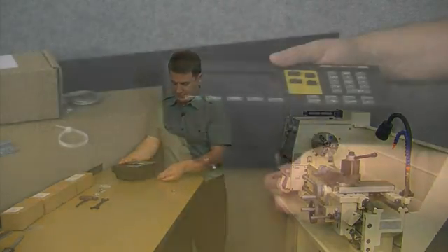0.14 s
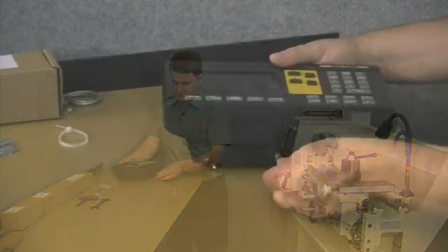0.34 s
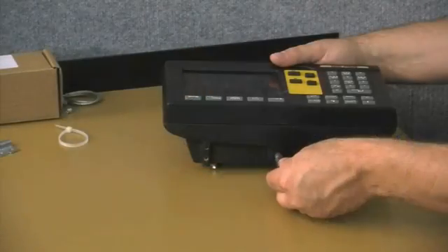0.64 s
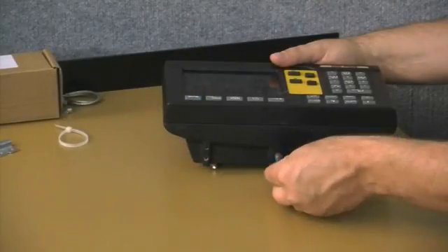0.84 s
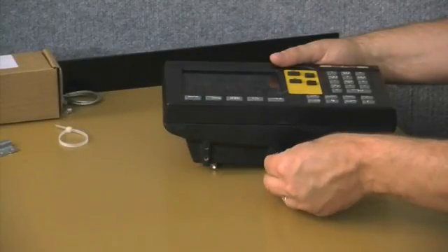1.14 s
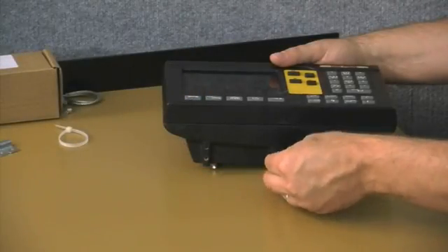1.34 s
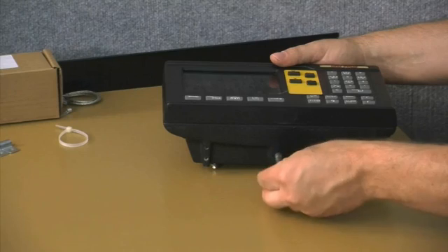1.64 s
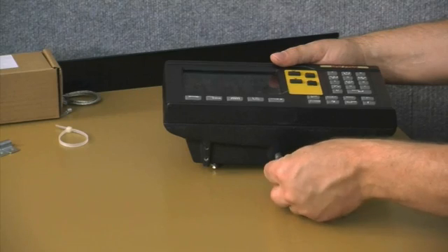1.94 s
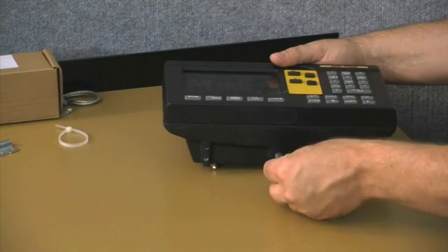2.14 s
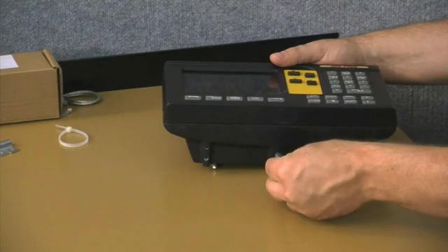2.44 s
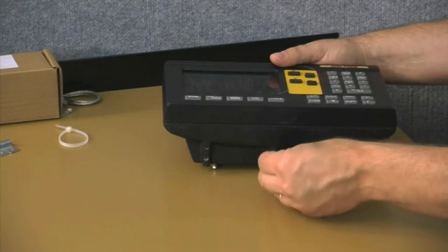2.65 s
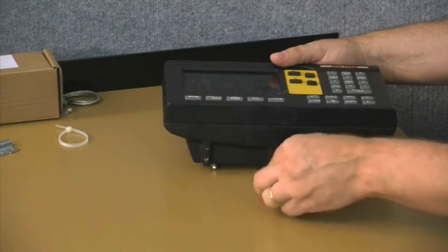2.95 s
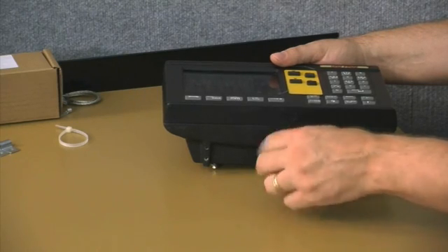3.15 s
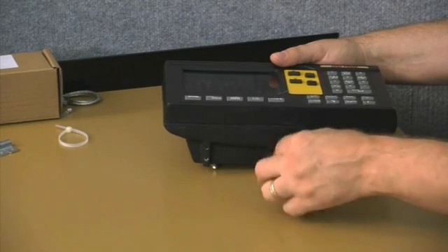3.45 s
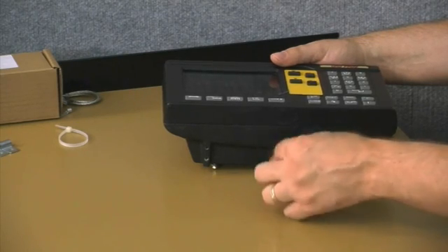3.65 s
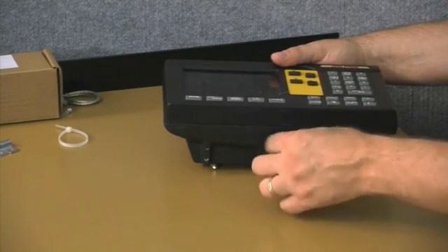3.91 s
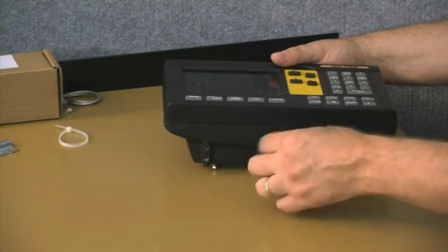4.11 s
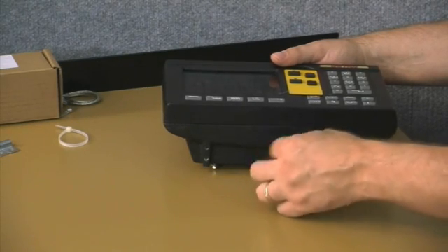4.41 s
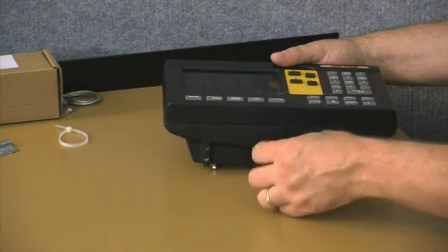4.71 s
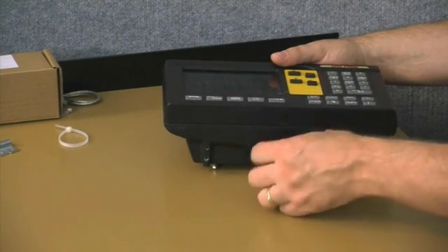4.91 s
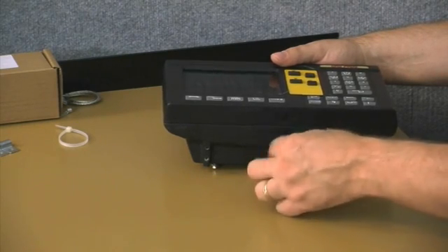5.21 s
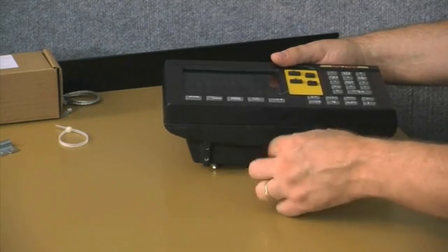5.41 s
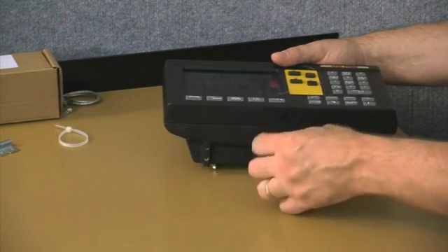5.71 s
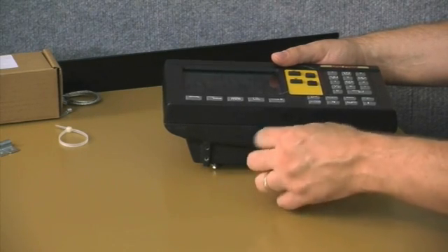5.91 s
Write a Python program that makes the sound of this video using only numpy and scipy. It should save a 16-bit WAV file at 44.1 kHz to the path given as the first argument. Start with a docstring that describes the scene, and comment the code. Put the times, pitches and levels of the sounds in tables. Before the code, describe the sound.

A quiet workshop with low steady ventilation rumble and faint hiss; everything else is close, with a brief diffuse echo. At about 0.2 s there is a faint nudge, then crisp metallic clicks with small case jolts at 0.44 and 0.6 s and a gritty thread scrape. From 1.1 to 1.3 s come dull boxy taps, at 1.5 s another clear click, then sparse faint nudges and rubs until 2.7 s. Around 3 s a first weak flick makes a light rattle with a click at 3.14 s; stronger scraping and chatter follow at 3.3 s, a bright burst at 3.56 s, and a weaker one near 3.7 s. From 4.1 s rolls arrive roughly every 0.2 s, each a finger bump then a bright, dense rattle under a tenth of a second long with hollow plastic drumming. They are loudest from 5.1 to 5.7 s; a softer one comes at 5.9 s.

```python
"""A steel nut on a threaded stud chatters as about five finger flicks a second spin it along a plastic-cased instrument.
First it only clicks and scrapes as the thread catches; then each flick bumps the case and rattles the loose nut.
Dense random impacts make the roll, and short noise bursts the single contacts; both excite modes of steel and case.
Patchy stick and slip makes the scrape; a diffuse workshop echo and filtered-noise ventilation surround it all."""
import sys
import numpy as np
from scipy import signal
from scipy.fft import rfft, irfft
from scipy.io import wavfile
from scipy.ndimage import uniform_filter1d

SR = 44100
rng = np.random.default_rng(int(sys.argv[2]) if len(sys.argv) > 2 else 0)


def waveform_to_disk(signal):
    """Save audio, clipped to [-1, 1], as 16-bit WAV at the path in sys.argv[1]."""
    frames = np.transpose(np.atleast_2d(signal))
    scaled = np.clip(frames, -1, 1) * 32767
    samples = np.round(scaled).astype(np.int16)
    wavfile.write(sys.argv[1], SR, samples)


N = 267539
TIME = np.arange(N) / SR
SIZE = 8192  # samples in an impulse response or a single contact
TOP_HZ = 15700  # upper limit of the sound
ROLL_HARD_DB = -29  # level of a middling roll, the reference for hardness
CASE_SHARE = 0.62  # dB that the case gains per dB of steel
HARDENING = 0.73  # dB of top treble gained per dB of level
ROLL_EDGE_DB = 12.5  # fall of a roll over its swell or dying time
ROLL_REACH = 0.92  # beyond this relative distance from its top a roll falls away steeply
TICK_GAP_S = 0.016  # the wobbling nut strikes the thread about once a turn
TICK_JITTER_S, TICK_SCATTER_DB = 0.002, 2  # unevenness of those ticks in time and level


def undb(db):
    """Decibel definition: amplitude gain is ten to the power of dB over 20."""
    return 10 ** (np.asarray(db) / 20)


def unit(x):
    """Normalisation: scale to rms 1."""
    return x / np.sqrt(np.mean(x ** 2))


def add(track, s, sound):
    """Superposition: mix a sound in at time s."""
    i = max(int(s * SR), 0)
    track[i:i + len(sound)] += sound[:max(N - i, 0)]


def colour(points, size):
    """Spectral shaping: gain at each FFT bin, interpolated on log frequency from (frequency [Hz], level [dB])."""
    hz, db = np.transpose(points)
    bins = np.arange(size // 2 + 1) * SR / size
    return undb(np.interp(np.log(bins + 1), np.log(hz), db))


def ring(force, response):
    """Linear response: convolve a force with an impulse response."""
    return signal.fftconvolve(force, response)[:len(force)]


def treble(x, db, corner_hz=7500):
    """Contact time sets bandwidth: a harder, shorter contact lifts the top; a softer one lowers it."""
    lowpass = signal.butter(2, min(corner_hz, SR / 3), fs=SR, output="sos")
    low = signal.sosfiltfilt(lowpass, x)
    return low + undb(db) * (x - low)


def hardness(db):
    """Nonlinear contact: the top treble in dB grows with the level, within limits."""
    return np.clip(HARDENING * (db - ROLL_HARD_DB), -9, 4)


def through_case(steel_db):
    """Contact shortening: a harder contact is shorter, so the case gains less level than the steel."""
    return ROLL_HARD_DB + CASE_SHARE * (steel_db - ROLL_HARD_DB)


def grains(rate, spread_db):
    """Poisson-like impacts: tiny strikes at random times, of random sign and unequal size."""
    struck = rng.random(N) < rate / SR
    sign = rng.choice([-1, 1], N)
    return struck * sign * undb(spread_db * np.clip(rng.standard_normal(N), -2, 2))


def uneven(rate, depth_db):
    """Random modulation: a gain that glides between random levels, some rate of them a second."""
    steps = np.clip(rng.standard_normal(N), -2, 2)
    return undb(depth_db * np.interp(TIME * rate, np.arange(N), steps))


# ventilation and hiss: (frequency [Hz], relative spectral density [dB per Hz])
AIR_SPECTRUM = [(20, -13), (55, 1), (80, -4), (130, 4.5), (180, -6), (250, -2), (480, -3), (620, -7.5),
                (800, -14), (1300, -14), (2000, -20), (5000, -21), (15500, -23)]


def air(level_db=-63):
    """Broadband flow noise: steady ventilation rumble under a faint hiss."""
    noise = irfft(rfft(rng.standard_normal(N)) * colour(AIR_SPECTRUM, N), N)
    return undb(level_db) * unit(noise)


# workshop echo by band: (centre [Hz], level [dB], 60 dB decay time [s])
ROOM_BANDS = [(125, -4.5, 0.94), (270, -0.5, 1), (516, 0, 0.76), (880, -7.5, 0.35), (1940, -7.5, 0.5),
              (4200, -8.5, 0.43), (7700, -14, 0.32), (16000, -19, 0.41)]


def workshop(dry, build_s=0.0036, wall_s=0.0367, wall_width_s=0.0031, wall_gain=1.0):
    """Diffuse reverberation: a tail builds up and decays by band, with a cluster of echoes from the nearest walls."""
    t, out = TIME[:SR], 0
    spectrum = rfft(rng.standard_normal(SR))
    log_hz = np.log(np.arange(len(spectrum)) + 1)
    centres = np.log([row[0] for row in ROOM_BANDS])
    walls = 1 + wall_gain * np.exp(-((t - wall_s) / wall_width_s) ** 2)
    for share, (_, db, t60) in zip(np.eye(len(ROOM_BANDS)), ROOM_BANDS):
        fade = np.exp(-np.log(1000) * t / t60) * (1 - np.exp(-t / build_s)) * walls
        band = irfft(spectrum * np.interp(log_hz, centres, share), SR)
        out = out + undb(db) * fade / np.linalg.norm(fade) * band
    return ring(dry, out)


def body(modes, crack):
    """Minimum-phase modal response: resonances on a dry crack, folded in the cepstrum, energy 1."""
    bins = np.arange(SIZE // 2 + 1) * SR / SIZE
    power = colour(crack, SIZE) ** 2
    for hz, width, db in modes:
        power = power + undb(2 * db) / (1 + ((bins - hz) / width) ** 2 * 2) ** 2
    # doubling the early half of the cepstrum and clearing the late half makes the response causal
    cepstrum = irfft(np.log(power) / 2)
    cepstrum[1:SIZE // 2] *= 2
    cepstrum[SIZE // 2 + 1:] = 0
    response = irfft(np.exp(rfft(cepstrum)))
    return response / np.linalg.norm(response)


def seatings(modes, crack, spread, count):
    """Boundary conditions shift modes: the nut seats differently at each touch, so the ring moves a little."""
    responses = []
    for _ in range(count):
        shifted = [(hz * (1 + spread * rng.standard_normal()), width, db) for hz, width, db in modes]
        responses.append(body(shifted, crack))
    return responses


def knock(response, rise_s, length_s, window_s):
    """Impact excitation: a few milliseconds of micro-bounces ring an object; its loudest moment has rms 1."""
    t = TIME[:SIZE]
    force = rng.standard_normal(SIZE) * (1 - np.exp(-(t / rise_s) ** 2)) * np.exp(-(t / length_s) ** 4)
    sound = ring(force, response)
    loudest = uniform_filter1d(sound ** 2, max(int(window_s * SR), 2)).max()
    return sound / np.sqrt(loudest)


def bump(panel, thud_db, drum_db, thud_hz=40, thud_s=0.006):
    """Quasi-static push and panel vibration: a soft damped thud, and the case panels drum."""
    t = TIME[:SIZE]
    push = np.sin(2 * np.pi * thud_hz * t) * np.exp(-t / thud_s)
    drum = knock(panel, rise_s=0.0014, length_s=0.0099, window_s=0.0066)
    return undb(thud_db) * push / push.max() + undb(drum_db) * drum


def skin_hiss(size):
    """Friction noise of skin sliding over steel: a narrow high hiss of rms 1."""
    shape = colour([(2000, -22), (6000, -6), (8200, -6), (9300, 3), (10800, -24), (13000, -26)], size)
    return unit(irfft(rfft(rng.standard_normal(size)) * shape, size))


# the nut is turned slowly and the threads rub, levels before the body trims:
# (start [s], length [s], level at the start [dB], level at the end [dB], skin hiss level [dB])
THREAD_RUBS = [(0.176, 0.07, -66, -73, -90), (0.571, 0.041, -52.5, -46.5, -61),
               (1.112, 0.038, -67, -58, -83), (1.297, 0.025, -53, -51, -76),
               (1.598, 0.039, -64, -62.5, -78), (2.037, 0.06, -62, -62, -82), (2.485, 0.14, -65, -62, -74),
               (2.69, 0.025, -61, -64, -81), (3.01, 0.09, -57, -55.5, -74), (3.3, 0.068, -49, -44.5, -55),
               (3.385, 0.12, -46, -47.5, -67), (3.743, 0.3, -49.5, -54.5, -78),
               (4.061, 0.035, -53, -51, -59), (5.061, 0.016, -36, -34, -48), (5.471, 0.022, -47, -41, -59)]


def rubbing(steel, case, panel, case_db=2.0, steel_db=-10, panel_db=-9, top_db=-4):
    """Stick-slip friction: thread slides patchily on thread, heard mostly through the case, with finger hiss."""
    pressure, skin = np.zeros(N), np.zeros(N)
    for s, length, start_db, end_db, skin_db in THREAD_RUBS:
        size = int(length * SR)
        add(pressure, s, undb(np.linspace(start_db, end_db, size)))
        add(skin, s, np.full(size, undb(skin_db)))
    slips = unit(grains(rate=980, spread_db=3) * uneven(rate=120, depth_db=4.5)) * pressure
    bodies = undb(case_db) * case + undb(steel_db) * steel + undb(panel_db) * panel
    scrape = ring(treble(slips, top_db), bodies)
    return scrape + skin * skin_hiss(N)


# the nut is pressed onto the stud, clicks and jolts the case, click levels before trim:
# (time [s], steel level [dB], case level [dB], top treble [dB], thud level [dB])
NUT_PRESSES = [(0.4396, -32.5, -42.5, -1, -47), (0.5961, -32, -38, 8, -45.5),
               (1.5168, -34.5, -36, 1.5, -46), (3.1357, -29.5, -48, 4, -47)]


def fingers(panel, press_drum_db=-9, thud_db=-14, drum_db=0.0, skin_db=-17, skin_delay_s=0.034, skin_s=0.0091):
    """Momentum transfer and friction: each touch bumps the case; in a flick the skin then hisses across the nut."""
    out = np.zeros(N)
    for s, *_, push_db in NUT_PRESSES:
        add(out, s, bump(panel, push_db, push_db + press_drum_db))
    stroke = np.exp(-((TIME[:SIZE] - skin_delay_s) / skin_s) ** 2)
    for s, touch_db, bump_db, *_ in FINGER_FLICKS:
        add(out, s, bump(panel, through_case(touch_db) + thud_db, bump_db + drum_db))
        add(out, s, undb(touch_db + skin_db) * skin_hiss(SIZE) * stroke)
    return out


def roll(s, fastest, swell, dying):
    """Envelope of spin-up and decay: 0 at full speed, about 1 at either end, then steeply more."""
    away = np.maximum((fastest - s) / swell, (s - fastest) / dying)
    return away * np.clip(away / ROLL_REACH, 1, 10) ** 2


def wobble(tick_db=-5.5, edge_db=4.5, top_db=2.0, top_scatter_db=3, case_db=-7, count=5):
    """Quasi-periodic impacts around each roll's top: (time [s], steel [dB], case [dB], top treble [dB])."""
    ticks = []
    for *_, fastest, swell, dying, roll_db, _ in FINGER_FLICKS:
        scatter = rng.standard_normal((count, 3))
        for turn, (late, louder, brighter) in enumerate(scatter, -(count // 2)):
            s = fastest + turn * TICK_GAP_S + late * TICK_JITTER_S
            db = roll_db + tick_db + TICK_SCATTER_DB * louder - edge_db * roll(s, fastest, swell, dying)
            ticks.append((s, db, through_case(db) + case_db, top_db + hardness(db) + top_scatter_db * brighter))
    return ticks


# the held nut nudges the stud, heard mostly through the case: (time [s], case level before trim [dB])
STUD_NUDGES = [(0.178, -50), (1.1414, -50.5), (1.253, -55.5), (1.29, -49), (1.3098, -44), (1.3207, -50),
               (1.483, -47), (1.728, -55.5), (1.7933, -50), (2.038, -53), (2.0948, -46.5), (2.508, -55),
               (2.697, -53.5)]
# hardest single strikes of the spinning nut: (time [s], steel level before trim [dB], top treble [dB])
NUT_STRIKES = [(3.074, -39.5, -12), (3.125, -39, 3), (3.1537, -33, -2), (3.3563, -37.5, 8.5),
               (3.555, -25, 8), (3.5641, -28.5, 11), (3.6004, -34.5, -5), (3.6242, -33.5, 8.5),
               (3.7093, -31, -3), (3.7284, -35.5, -6), (3.8604, -37, -11), (3.8706, -38, 11.5),
               (4.1077, -26, 6), (4.1514, -33.5, 3), (4.2807, -33, -3), (4.3208, -33, 6.5),
               (4.4653, -30, 3), (4.4748, -33, -1), (4.5292, -31, 0), (4.68, -25, 0), (4.6858, -21, -5),
               (4.7445, -30, -2), (4.8451, -27, 1), (4.8638, -28.5, 4), (4.941, -32, -10),
               (5.0678, -30, 13), (5.0862, -23, 10), (5.1072, -25, 11.5), (5.2886, -25, -5),
               (5.3315, -33, 4), (5.3468, -33, 4), (5.6728, -35, -8), (5.7047, -27.5, 11),
               (5.7341, -28, -3), (5.8851, -33, -2), (5.9193, -32.5, 5)]


def contacts(nudge_steel_db=-14, nudge_top_db=-12, touch_case_db=-3, touch_top_db=5.5, strike_case_db=-8):
    """Discrete impacts of nut and stud: (time [s], steel [dB], case [dB], top treble [dB])."""
    presses = [(s, steel, case, top_db) for s, steel, case, top_db, _ in NUT_PRESSES]
    nudges = [(s, db + nudge_steel_db, db, nudge_top_db) for s, db in STUD_NUDGES]
    touches = [(s, db, through_case(db) + touch_case_db, hardness(db) + touch_top_db)
               for s, db, *_ in FINGER_FLICKS]
    strikes = [(s, db, through_case(db) + strike_case_db, top_db) for s, db, top_db in NUT_STRIKES]
    return presses + nudges + touches + strikes + wobble()


def clicks(hits, steels, cases, steel_db=-0.37, case_db=-1.5):
    """Impact across a clearance: the nut tips across its play, strikes the thread and rings steel and case."""
    out = np.zeros(N)
    for s, steel_level, case_level, top_db in hits:
        seat = rng.integers(len(steels))
        tick = knock(steels[seat], rise_s=0.00033, length_s=0.0041, window_s=0.0017)
        thump = knock(cases[seat], rise_s=0.00049, length_s=0.0052, window_s=0.0016)
        add(out, s, undb(steel_level + steel_db) * treble(tick, top_db))
        add(out, s, undb(case_level + case_db) * thump)
    return out


# a finger lands, bumps the case and flicks the nut into a roll, levels before trim:
# (landing [s], touch level [dB], bump level [dB], fastest moment [s], swell [s], dying [s],
# roll level [dB], panel drumming level [dB])
FINGER_FLICKS = [(2.988, -55.5, -62, 3.15, 0.056, 0.061, -39.5, -51.5),
                 (3.286, -33, -41.5, 3.343, 0.037, 0.083, -40, -61),
                 (3.4857, -34.5, -41, 3.562, 0.053, 0.04, -28.5, -39),
                 (3.6705, -39, -43, 3.72, 0.018, 0.22, -39.5, -52.5),
                 (3.864, -45, -44, 3.915, 0.014, 0.021, -44.5, -54),
                 (4.0434, -38, -44.5, 4.122, 0.029, 0.036, -26.5, -42),
                 (4.232, -35.5, -43, 4.299, 0.027, 0.029, -30.5, -41.5),
                 (4.4331, -30.5, -51, 4.503, 0.026, 0.024, -29.5, -45.5),
                 (4.6301, -30, -48, 4.69, 0.037, 0.036, -25.5, -40.5),
                 (4.8406, -28, -40.5, 4.908, 0.037, 0.024, -31.5, -46),
                 (5.03, -28.5, -43, 5.101, 0.022, 0.036, -24, -34),
                 (5.2411, -29.5, -47, 5.298, 0.025, 0.028, -23.5, -35.5),
                 (5.4439, -31.5, -43.5, 5.498, 0.0078, 0.031, -24.5, -36),
                 (5.6491, -35.5, -46.5, 5.707, 0.018, 0.02, -23, -35),
                 (5.865, -31.5, -43.5, 5.926, 0.014, 0.025, -32, -46)]


def chatter(steel, case, panel, steel_db=-2.0, top_db=1.0, case_db=-7.5, panel_db=-0.5):
    """Dense random impacts: a flicked nut rattles in a roll that swells and dies; the harder, the brighter."""
    on_steel, on_panel = np.zeros(N), np.zeros(N)
    for *_, fastest, swell, dying, roll_db, drum_db in FINGER_FLICKS:
        t = np.arange(fastest - 2 * swell, fastest + 2 * dying, 1 / SR)
        shape = undb(-ROLL_EDGE_DB * roll(t, fastest, swell, dying))
        add(on_steel, t[0], undb(roll_db) * shape)
        add(on_panel, t[0], undb(drum_db) * shape)
    db = 20 * np.log10(on_steel + 1e-9)
    rattle = unit(grains(rate=3500, spread_db=3) * uneven(rate=240, depth_db=3.0))
    steel_sound = undb(steel_db) * ring(treble(on_steel * rattle, hardness(db) + top_db), steel)
    case_sound = ring(undb(through_case(db) + case_db) * rattle, case)
    panel_sound = undb(panel_db) * ring(on_panel * rattle, panel)
    return steel_sound + case_sound + panel_sound


# modes of nut and stud, of the hollow case, and of its broad panels:
# (frequency [Hz], width [Hz], relative level [dB])
NUT_MODES = [(2275, 38, -5.5), (2506, 150, -5), (2913, 76, -2.5), (3427, 131, 6.5), (3830, 238, 5.5),
             (4130, 130, -4.5), (4580, 116, 0.5), (4856, 106, 1), (5297, 310, 3.5), (5670, 69, -12),
             (5925, 140, 2), (6210, 340, -0.5), (6490, 58, 6), (6850, 290, 1), (7440, 140, -4.5),
             (8060, 140, -1), (8400, 400, -5.5), (8650, 200, -9), (9230, 370, -6.5), (10070, 170, -9.5),
             (10770, 130, -9.5), (11340, 210, -12.5), (13100, 320, -24), (14750, 490, -19)]
HOLLOW_MODES = [(494, 25.7, 2.5), (665, 140, -2.5), (810, 71, -4.5), (968, 112, 3.5), (1112, 47, 6.5),
                (1272, 46, 10), (1360, 66, 3), (1340, 80, -3), (1433, 58, -2), (1542, 190, -6.5)]
DRUM_MODES = [(142.3, 26, 0), (209, 14.4, 3), (236.8, 23.3, 3.5), (294, 82, -1), (396, 22.4, 0.5)]
# dry crack of a contact under the modes of each: (frequency [Hz], relative level [dB])
NUT_CRACK = [(600, -27.5), (1700, -18.5), (2200, -10.5), (3100, -41.5), (3500, -9), (4300, -12.5),
             (6500, -9.5), (9500, -16.5), (11500, -19.5), (12700, -24.5), (15500, -39)]
HOLLOW_CRACK = [(25, -52), (90, -24), (200, -17), (600, -19.5), (1300, 0), (1750, -15), (2600, -14),
                (5000, -64)]
DRUM_CRACK = [(30, -3), (100, -7), (350, -15.5), (550, -12.5), (1500, -45), (4000, -91)]


def scene():
    """Superposition of direct and reverberant sound: nut, case and fingers close by, in the room."""
    steel, case = body(NUT_MODES, NUT_CRACK), body(HOLLOW_MODES, HOLLOW_CRACK)
    panel = body(DRUM_MODES, DRUM_CRACK)
    steels = seatings(NUT_MODES, NUT_CRACK, spread=0.015, count=12)
    cases = seatings(HOLLOW_MODES, HOLLOW_CRACK, spread=0.024, count=12)
    turning = chatter(steel, case, panel) + rubbing(steel, case, panel) + fingers(panel)
    # a click sounds a little different in each direction, so the walls return a smoother blend of it
    hits = contacts()
    direct, leftward, rightward = (turning + clicks(hits, steels, cases) for _ in range(3))
    echo = (workshop(leftward) + workshop(rightward)) / np.sqrt(2)
    return (direct + echo + air())[None]


def record(dry):
    """Band limitation: a steep elliptic low-pass cuts the top."""
    lowpass = signal.ellip(10, 0.2, 70, TOP_HZ, fs=SR, output="sos")  # 0.2 dB ripple, 70 dB rejection
    return signal.sosfilt(lowpass, dry)


dry = scene()
out = record(dry)
waveform_to_disk(out)
```